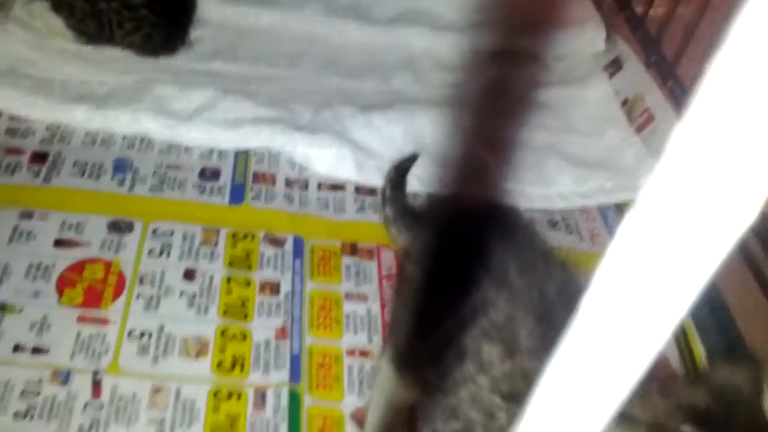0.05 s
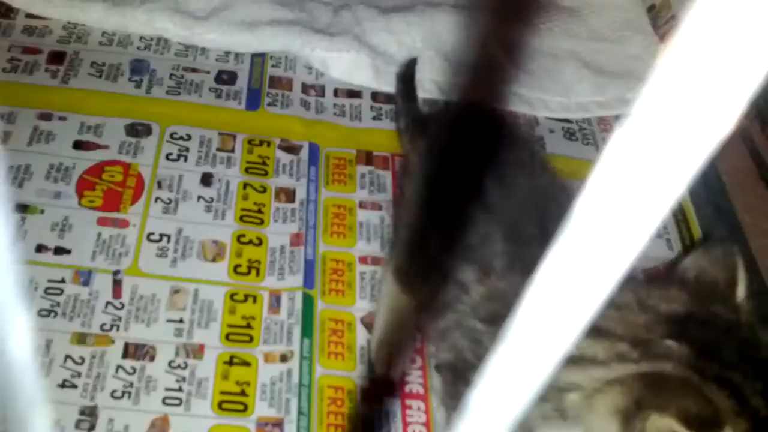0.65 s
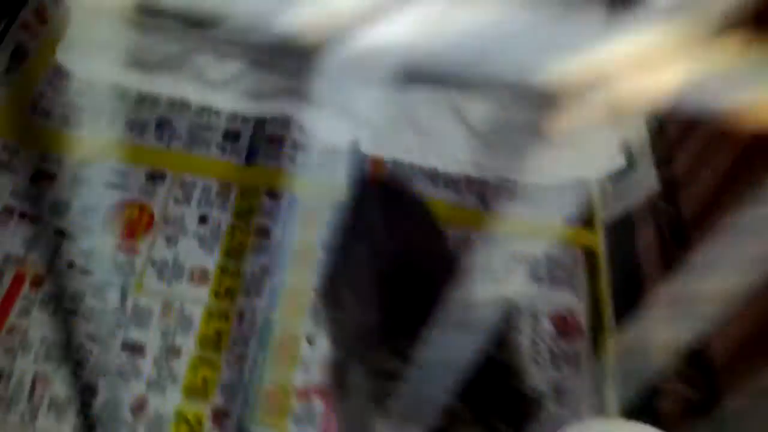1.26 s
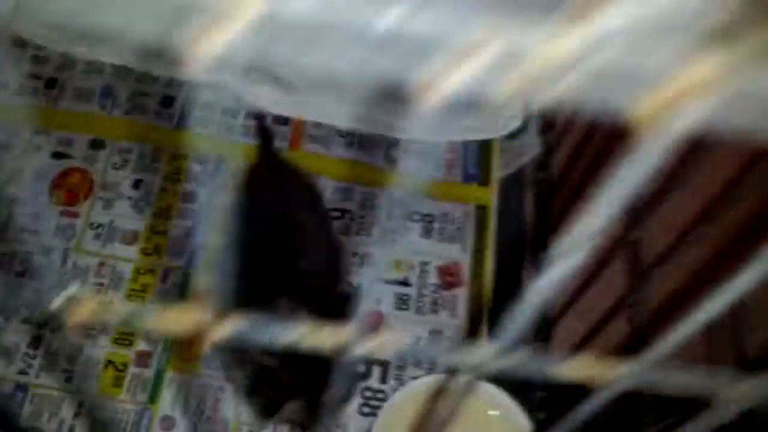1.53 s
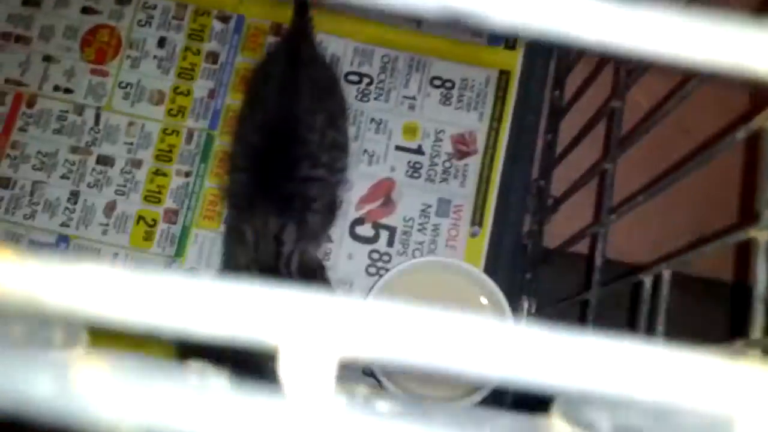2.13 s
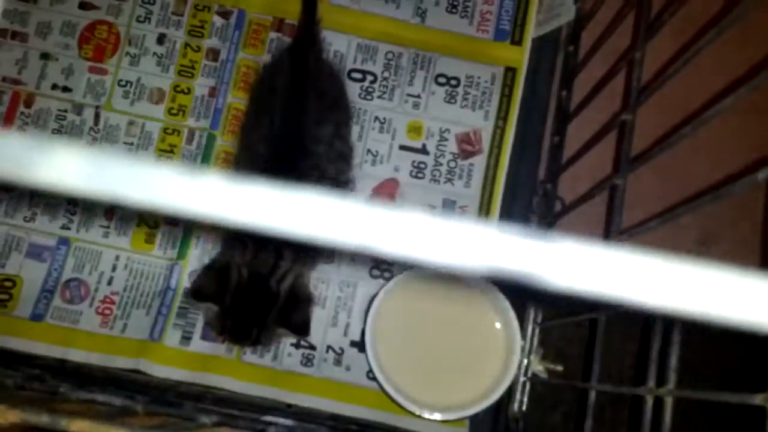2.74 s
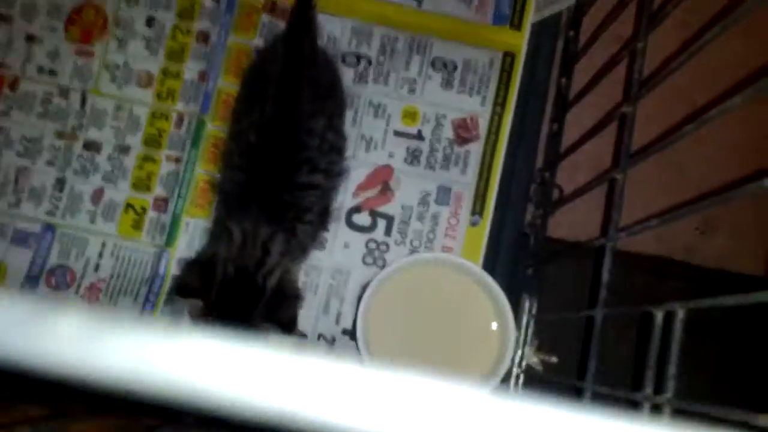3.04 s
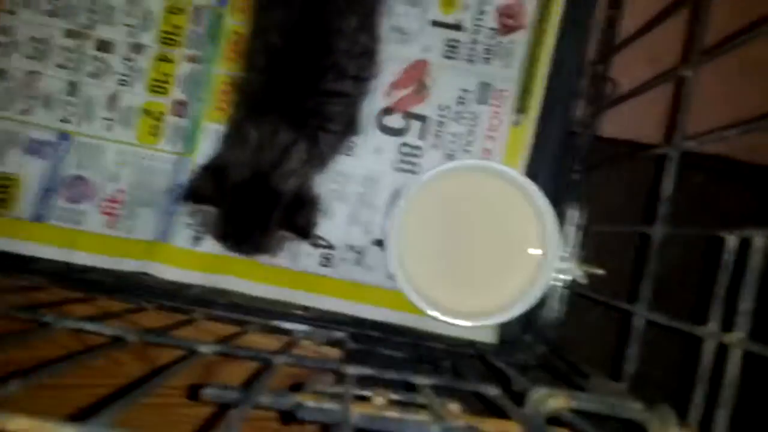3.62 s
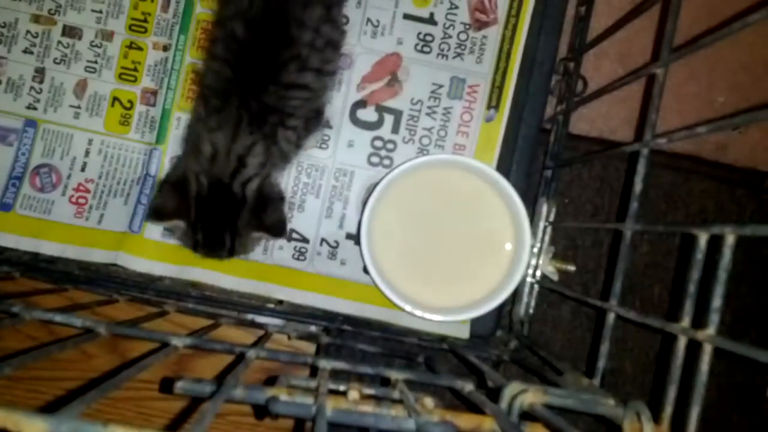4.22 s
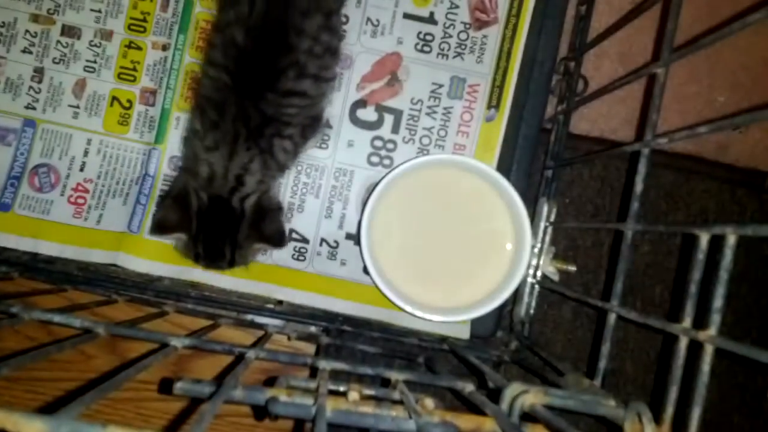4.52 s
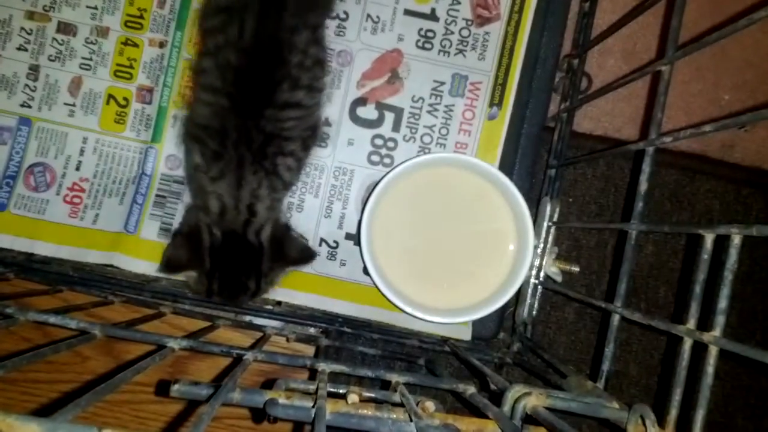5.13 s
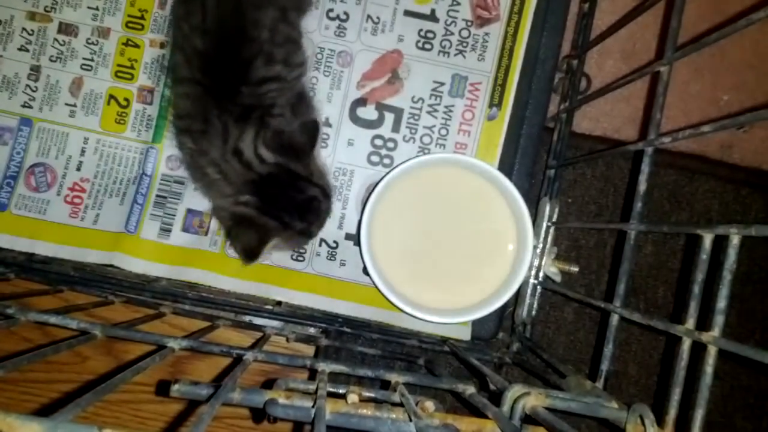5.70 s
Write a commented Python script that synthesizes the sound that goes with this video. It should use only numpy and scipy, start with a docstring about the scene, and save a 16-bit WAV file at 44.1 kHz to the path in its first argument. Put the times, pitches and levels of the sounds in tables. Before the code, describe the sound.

Soft, close rubbing and small creaks from a hand on the microphone open the scene, with faint ticks of newspaper. Just past halfway the microphone hits a cage bar with a loud crack. Loose wires of the crate then chatter, scrape and ring, growing louder over dull tray thumps, a heavy bump and brief scratches of kitten claws on paper. A quiet indoor hum with a faint whine lies underneath.

```python
"""A hand brushes a camera and a low ring dies away; then kittens stir on newspaper in a wire crate.
Creases tick and claws scuff; a finger swishes over the camera casing, the hand rubs and creaks on it,
and it knocks against a bar as it is pushed in. Then the crate rattles: loose wires strike, chatter and
ring the welded mesh, and the floor tray thumps. A quiet room with a faint whine lies underneath."""
import sys
import numpy as np
from scipy import signal
from scipy.fft import rfft, irfft
from scipy.io import wavfile
from scipy.ndimage import uniform_filter1d

SR = 44100
rng = np.random.default_rng(int(sys.argv[2]) if len(sys.argv) > 2 else 0)


def put_to_file(sound):
    """Save the sound as 16-bit audio at rate SR, in the file named by the first command-line argument."""
    columns = np.atleast_2d(sound).T  # one column per channel
    safe = np.clip(columns, -1, 1)
    whole_steps = np.round(safe * 32767)
    wavfile.write(sys.argv[1], SR, whole_steps.astype(np.int16))


N = 254406
T = np.arange(N) / SR


def undb(db):
    """Decibels to gain."""
    return 10 ** (np.asarray(db) / 20)


def unit(x, span_s=None):
    """Scale to rms 1, over the first span_s or over all."""
    head = x if span_s is None else x[:int(span_s * SR)]
    return x / np.sqrt(np.mean(head ** 2) + 1e-18)


def add(out, time_s, x):
    """Mix x in from time_s."""
    i = max(int(time_s * SR), 0)
    out[i:i + len(x)] += x[:max(N - i, 0)]


def filt(x, hz, kind, order=2):
    """Butterworth filter."""
    sos = signal.butter(order, np.clip(hz, 10, SR * .48), kind, fs=SR, output="sos")
    return signal.sosfilt(sos, x)


def noise(colour, size=N):
    """Noise of rms 1 with a spectrum of (frequency [Hz], level [dB]) points."""
    hz, db = np.transpose(colour)
    bins_hz = np.maximum(np.fft.rfftfreq(size, 1 / SR), 1)
    gain = undb(np.interp(np.log(bins_hz), np.log(hz), db))
    return unit(irfft(rfft(rng.standard_normal(size)) * gain, size))


def walk(rate_hz):
    """Random curve of spread 1, with rate_hz knots a second."""
    knots = rng.standard_normal(N // 20)
    return np.interp(T * rate_hz, np.arange(len(knots)), knots) * np.sqrt(3 / 2)


def stroke_gain(strokes, column):
    """Smoothed gain of a dB column over all strokes; silence between them."""
    gain = np.zeros(N)
    for rows in map(np.array, strokes):
        active = (T >= rows[0, 0]) & (T <= rows[-1, 0])
        gain += undb(np.interp(T, rows[:, 0], rows[:, column])) * active
    return uniform_filter1d(gain, size=300)


def swells(events, column, slopes_db_per_s):
    """Gain of events that rise, sag while they hold, then fall; column picks their level."""
    rise, sag, fall = slopes_db_per_s
    gain = np.zeros(N)
    for row in events:
        t, hold_s = T - row[0], row[1]
        drop_db = rise * np.maximum(-t, 0) + sag * np.clip(t, 0, hold_s)
        drop_db += fall * np.maximum(t - hold_s, 0)
        gain += undb(row[column] - drop_db)
    return gain


def mode_bank(modes, t):
    """One decaying complex sine per (frequency [Hz], level [dB], t60 [s]) mode."""
    hz, db, t60_s = np.transpose(modes)[:, :, None]
    return undb(db - 60 * t / t60_s) * np.exp(2j * np.pi * hz * t)


def strike(bank, spread_db):
    """Each blow lands elsewhere and shares its energy differently among the modes."""
    size, turn = rng.standard_normal((2, len(bank)))
    weights = undb(spread_db * size) * np.exp(2j * np.pi * turn)
    return np.einsum("m,mt->t", weights, bank).imag


def by_hardness(ends, hardness):
    """Interpolate between the (softest, hardest) contact's values."""
    return np.interp(hardness, [0, 1], ends)


# room noise spectrum: (frequency [Hz], level [dB])
ROOM_COLOUR = [(25, 7), (100, 6), (250, -4), (500, -12), (1000, -16), (1750, -19), (5000, -22), (7000, -20),
               (15000, -21.5)]
# electrical whine: (centre [Hz], width [Hz], level [dB])
WHINE_BANDS = [(473.6, 9.7, -70.5), (2570, 410, -69), (3840, 47, -77), (11600, 160, -77)]


def room(level_db=-56.5, whine_step_s=2.0, early_whine_db=-10):
    """Indoor rumble and hiss, with a thin electrical whine that steps up in level."""
    whine = np.zeros(N)
    for hz, width_hz, db in WHINE_BANDS:
        band_hz = [hz - width_hz / 2, hz + width_hz / 2]
        whine += undb(db) * unit(filt(rng.standard_normal(N), band_hz, "band"))
    whine *= undb(early_whine_db * (T < whine_step_s))
    return noise(ROOM_COLOUR) * undb(level_db) + whine


# spectrum of the crate's low ring: (frequency [Hz], level [dB])
HUM_COLOUR = [(80, -22), (135, -2.5), (175, 1), (225, -15), (282, -1), (340, -17.5), (1200, -21),
              (2500, -41)]


def crate_hum(level_db=-36.5, t60_s=0.89):
    """The crate's rough low ring fades out after a bump."""
    return noise(HUM_COLOUR) * undb(level_db - 60 * T / t60_s)


def squeak(start_s=0.077, length_s=0.12, hz=2975, level_db=-61):
    """A thin, wavering squeak."""
    swell = np.sqrt(np.clip(1 - (2 * (T - start_s) / length_s - 1) ** 2, 0, 1))
    pitch_hz = hz * (1 + 0.0038 * walk(160))
    return undb(level_db) * swell * np.sin(2 * np.pi * np.cumsum(pitch_hz) / SR)


# hand slides on the camera, one curve per stroke: (time [s], friction [dB], hiss [dB])
RUBS = [
    [(0.99, -69, -70), (1.01, -60, -66), (1.13, -53, -57.5), (1.24, -40, -45), (1.338, -40.5, -43.5),
     (1.378, -36, -37.5), (1.424, -39.5, -41), (1.48, -45.5, -36.5), (1.526, -42, -38.5), (1.545, -51, -54)],
    [(1.545, -53, -49), (1.589, -45, -37.5), (1.647, -44.5, -45), (1.761, -46.5, -45.5), (1.821, -44, -38),
     (1.891, -52, -51), (1.935, -77, -75)],
    [(2.97, -60, -61), (3.042, -51, -50.5), (3.084, -41.5, -45), (3.102, -35, -28), (3.13, -25, -17),
     (3.25, -44, -30), (3.344, -56.5, -57), (3.408, -54.5, -47.5), (3.43, -45, -46)],
]
# brief hand contacts: (time [s], hold [s], friction [dB], hiss [dB], rumble [dB])
BRUSHES = [(0, 0.007, -41, -37, -32), (1.805, 0.08, -66, -63, -44.5), (3.555, 0.13, -44.5, -44.5, -42)]
# spectrum of skin on casing: (frequency [Hz], level [dB])
RUB_COLOUR = [(50, -6), (108, -5.5), (362, -14), (646, -9.5), (1200, -10.5), (1910, -10), (3000, -10.5),
              (4500, -17), (6870, -10.5), (9180, -14), (13500, -14), (16000, -17.5)]


def hand_rubs(split_hz=4500, rumble_hz=520, rumble_db=-4.5, fast_db=-24, rasp_db=-9):
    """Skin drags over the casing: fine friction grains above an uneven low judder."""
    drag = noise(RUB_COLOUR)
    grain = undb(2 * walk(350) + walk(35.74))
    mids = filt(filt(drag, rumble_hz, "high", order=3), split_hz, "low", order=5)
    friction = unit(mids * grain)
    hiss = unit(filt(drag, split_hz, "high", order=5) * grain)
    rumble = unit(filt(drag, rumble_hz, "low", order=3) * undb(1.5 * walk(70)))
    slopes_db_per_s = (390, 22, 220)
    pressure = stroke_gain(RUBS, 1) + swells(BRUSHES, 2, slopes_db_per_s)
    speed = stroke_gain(RUBS, 2) + swells(BRUSHES, 3, slopes_db_per_s)
    judder = undb(rumble_db) * stroke_gain(RUBS, 1) + swells(BRUSHES, 4, slopes_db_per_s)
    # a fast stroke is sharper and makes the casing rasp
    sharpness = np.clip(speed / undb(fast_db), 0, 1) ** 2
    rasp = unit(filt(rng.standard_normal(N), [2300, 3200], "band") * grain)
    friction = (1 - sharpness / 3) * friction + (undb(rasp_db) + sharpness / 3) * rasp
    air = unit(filt(rng.standard_normal(N), 8600, "high") * grain)
    hiss = np.sqrt(1 - sharpness / 2) * hiss + np.sqrt(sharpness / 2) * air
    return friction * pressure + hiss * speed + rumble * judder


# runs of grip slips: (last slip [s], gap [s], count, last thud [dB], last grit [dB], push [s])
CREAKS = [(0.916, .009, 6, -54.5, -58, 0.00041), (0.966, 0.012, 4, -49, -58, 0.0011),
          (0.971, .02, 1, -51, -63, 0.00042), (1.085, 0.018, 4, -44.5, -53.5, 0.00082),
          (1.147, .02, 1, -53, -46, 0.0007), (1.933, 0.014, 5, -54, -68, 0.0021),
          (1.978, .02, 1, -56.5, -61, 0.0006), (2.331, 0.026, 2, -48, -48.5, 0.0021),
          (2.381, .02, 1, -45.5, -45, 0.0025), (2.402, .02, 1, -48, -51, 0.0014),
          (3.051, .0107, 4, -41, -63, 0.00066), (3.381, 0.029, 2, -52, -46.5, 0.00033),
          (3.402, .02, 1, -38.5, -50, 0.0011), (3.447, 0.0069, 3, -43.5, -50, 0.0015),
          (3.671, 0.05, 1, -43, -63, 0.0011)]


def grip_creaks(grit_s=0.0021, growth_db=1, early_push_db=-5, jitter=.08, scatter_db=1.2):
    """The grip slips in growing, uneven runs; each slip pushes the casing in and out and spurts grit."""
    out, t = np.zeros(N), T[:SR // 25] - .004
    for last_s, gap_s, count, thud_db, grit_db, push_s in CREAKS:
        u = t / push_s
        push = unit(u / (1 + u ** 2) ** 2, 0.013)
        for before_last in range(round(count)):
            early = before_last > 0  # early slips mostly grind; only the last lets go fully
            body, grit = rng.standard_normal((2, len(t))) * np.exp(-abs(t) / grit_s)
            body = unit(filt(body, [350, 1450], "band"), 0.0097)
            grit = unit(filt(grit, 1800, "high", order=1), 0.0053)
            thud = undb(5.5 + early_push_db * early) * push + undb(-2.5) * body
            slip = undb(thud_db) * thud + undb(grit_db) * grit
            shift, size = rng.standard_normal(2) * early
            time_s = last_s - (before_last + jitter * shift) * gap_s
            add(out, time_s - .002, undb(scatter_db * size - growth_db * before_last) * slip)
    return out


# finger slides on the casing: (time [s], hold [s], body [dB], hiss [dB])
SWISHES = [(.35, 0.11, -49, -50), (.712, 0.17, -55, -41.5), (2.15, 0.0099, -56, -61),
           (3.24, 0.06, -67, -36), (3.45, 0.072, -47.5, -33), (3.84, 0.0015, -53, -45),
           (3.875, 0.0057, -47, -50.5)]
# finger swish spectrum: (frequency [Hz], level [dB])
SWISH_COLOUR = [(300, -1.5), (600, 5.5), (1100, -0.5), (1600, -4), (2200, -3.5), (3100, 0.5), (4000, -20),
                (5900, -11), (8000, -9.5), (9400, -20.5), (10800, -6.5), (11900, -4), (13700, -6),
                (16000, -12)]


def finger_swishes(split_hz=4200, grain_db=2, hollow_hz=1530, hollow_db=9):
    """A finger slides over the camera casing with a grainy, slightly hollow swish."""
    slide = noise(SWISH_COLOUR) * undb(grain_db * walk(500))
    slide += undb(hollow_db) * filt(slide, [hollow_hz - 70, hollow_hz + 70], "band", order=1)
    slopes_db_per_s = (960, 40, 780)
    body = unit(filt(slide, split_hz, "low", order=4)) * swells(SWISHES, 2, slopes_db_per_s)
    hiss = unit(filt(slide, split_hz, "high", order=4)) * swells(SWISHES, 3, slopes_db_per_s)
    return body + hiss


# crease snaps: (time [s], level [dB], pitch [Hz], decay [s])
CRINKLES = [(0.211, -49, 12000, 0.0014), (0.503, -41, 2560, 0.0025), (.534, -37.5, 3430, 0.0015),
            (.801, -39, 11800, 0.0017), (2.775, -42.5, 10000, 0.0011), (2.841, -33, 10600, 0.0098),
            (3.843, -37.5, 11300, 0.0017), (4.594, -26.5, 4700, 0.0016)]


def paper_crinkles():
    """Creases in the newspaper snap with short ticks."""
    out, t = np.zeros(N), T[:SR // 8]
    for time_s, db, hz, decay_s in CRINKLES:
        snap = unit(filt(rng.standard_normal(len(t)), [hz / 2, hz * 1.17], "band", order=1))
        add(out, time_s, undb(db) * filt(snap, 510, "high") * np.exp(-t / decay_s))
    return out


# claws on paper: (time [s], level [dB], decay [s])
SCUFFS = [(4.533, -47, 0.023), (4.831, -41.5, 0.039), (5.263, -25, .022), (5.284, -24, 0.049),
          (5.436, -32, 0.02), (5.727, -29.5, .028)]
# scuff spectrum: (frequency [Hz], level [dB])
SCUFF_COLOUR = [(1200, -15), (2600, 0.5), (3600, -1.5), (4200, -6), (5200, -4.5), (5800, -1), (6450, 2),
                (9500, -14), (15000, -33)]


def claw_scuffs(grain_db=3):
    """A claw catches the paper and drags: a sudden crackle that fades."""
    out, t = np.zeros(N), T[:SR // 4]
    for time_s, db, decay_s in SCUFFS:
        crackle = noise(SCUFF_COLOUR, size=len(t)) * undb(grain_db * walk(707)[:len(t)])
        add(out, time_s, undb(db) * unit(crackle) * np.exp(-t / decay_s))
    return out


# camera hits a bar: (time [s], level [dB], final pitch [Hz], decay [s], crack re tone [dB])
KNOCKS = [(0.2643, -31, 470, 0.0021, -19), (3.5245, 15, 1188, 0.00097, -1.5),
          (3.5268, -9, 145, 0.0039, -10.5), (3.5357, -18.5, 1380, 0.00067, 3),
          (4.425, -12.5, 477, 0.0013, -7), (4.78, -20.5, 229, 0.0018, -12),
          (5.3236, 14.5, 188, 0.0017, -39), (5.336, -12.5, 2070, 0.00075, 9),
          (5.652, -20.5, 266, .002, -14)]


def camera_knocks(stiffening=1.67):
    """Blows on the camera body reach the microphone directly: a crack and a few dead cycles."""
    out, t = np.zeros(N), T[:SR // 20]
    for time_s, db, hz, decay_s, crack_db in KNOCKS:
        fade = np.exp(-t / decay_s)
        crack = unit(filt(rng.standard_normal(len(t)), 3700, "low"))
        pitch_hz = hz * (1 + stiffening * fade)  # the contact softens as it lets go
        tone = np.sin(2 * np.pi * np.cumsum(pitch_hz) / SR)
        add(out, time_s, undb(db) * fade * (tone + undb(crack_db) * crack))
    return out


# bar resonances: (frequency [Hz], level [dB], t60 [s])
BAR_MODES = [(300, 1.5, 0.22), (738, -5, .07), (1250, -11.5, 0.069), (2410, -9, 0.054), (5640, -16.5, 0.12),
             (6320, -13, .14)]


def bar_ring(time_s=3.525, level_db=-34.5, chatter_s=0.052):
    """The bar that takes the hardest knock chatters in its seat and rings roughly."""
    out, t = np.zeros(N), T[:SR]
    bounces = rng.standard_normal(len(t)) ** 3 * np.exp(-t / chatter_s)
    tones = mode_bank(BAR_MODES, t).imag.sum(0)
    ring = signal.fftconvolve(tones, bounces)[:len(t)]
    add(out, time_s, undb(level_db) * unit(ring, 0.053))
    return out


# bumps on the tray: (time [s], slap [dB], cutoff [Hz], boom [dB])
THUMPS = [(3.53, -30.5, 200, -39), (3.553, -37.5, 600, -42.5), (4.413, -30.5, 121, -36),
          (4.574, -35, 125, -47), (4.761, -34.5, 176, -36), (4.78, -36.5, 420, -27), (5.036, -35, 560, -28),
          (5.132, -35, 330, -47), (5.179, -34.5, 214, -24), (5.326, -23, 690, -44),
          (5.483, -35.5, 197, -43), (5.6, -36.5, 129, -52), (5.648, -35.5, 407, -27)]
# tray resonances: (frequency [Hz], level [dB])
TRAY_MODES = [(65.4, -3.5), (91.6, -2.5), (134.7, -2.5), (184, -2), (239, -9.5), (291.4, -2.5), (337.5, -5),
              (382, -3.5), (422, -2), (465.6, -3)]


def floor_tray(t60_s=0.4, flap_db=-3, flap_s=0.031, shake_db=(-27.5, -8.5), shake_hz=600, drag_db=-13,
               boom_hz=133.1, boom_rise_s=0.01, boom_t60_s=0.24):
    """The tray slaps and booms like a drum skin when bumped, and trembles when wires strike or drag."""
    out, t = np.zeros(N), T[:SR // 2]
    bank = mode_bank([(hz, db, t60_s) for hz, db in TRAY_MODES], t)
    shakes = [(time_s, db + by_hardness(shake_db, hardness), shake_hz)
              for time_s, db, hardness, _ in RATTLES]
    for time_s, db, cutoff_hz, *_ in THUMPS + shakes:
        ring = unit(strike(bank, spread_db=2.5) * (undb(-8) + np.exp(-t / 0.03)), 0.052)
        flap = unit(filt(rng.standard_normal(len(t)), [75, 520], "band") * np.exp(-t / flap_s), 0.026)
        slap = filt(filt(ring + undb(flap_db) * flap, cutoff_hz, "low"), 56, "high", order=3)
        add(out, time_s, undb(db) * unit(slap, 0.063))
    boom = mode_bank([(boom_hz, 0, boom_t60_s)], t)[0].imag * (1 - np.exp(-t / boom_rise_s))
    for time_s, _, _, boom_db in THUMPS:
        add(out, time_s, undb(boom_db) * boom / boom.max())
    tremble = unit(signal.fftconvolve(rng.standard_normal(N), bank.imag.sum(0))[:N])
    return out + undb(drag_db) * tremble * swells(SCRAPES, 2, SCRAPE_SLOPES_DB_PER_S)


# clear wire resonances: (frequency [Hz], level [dB])
WIRE_MODES = [(675, -9), (974, -4), (994, -2), (1111, -9), (1256, -6), (1418, -1), (1497, -5), (1550, -5),
              (1642, 0), (1686, -1), (1949, -3), (2305, -8), (2410, -11), (2675, -5), (3110, -10),
              (3400, -11), (4555, -11), (4834, -11), (5090, -11), (5599, -14), (6794, -3), (6942, -7),
              (7400, -9), (9520, -16), (10730, -14), (14250, -11)]
# spectrum of the weaker mesh modes: (frequency [Hz], level [dB])
MESH_COLOUR = [(550, -5), (974, 4), (1120, 0.5), (1680, 4), (2150, -13), (2900, -1.5), (3400, -5),
               (4000, -17), (5000, -9), (6050, -18.5), (7000, -1), (8800, -18), (10600, -13.5),
               (12000, -31), (13300, -17), (14200, -5.5), (15300, -35)]
MESH_SPLIT_HZ = 3900


def mesh_response(wire_t60_s=0.39, dull_t60_s=0.66, bright_t60_s=0.19, detune=.003):
    """The welded mesh answers one contact: clear modes, detuned by the load, in a crowd of weaker ones."""
    t = T[:SR // 2]
    crowd = noise(MESH_COLOUR, size=len(t))
    dull = filt(crowd, MESH_SPLIT_HZ, "low", order=1)
    crowd = dull * undb(-60 * t / dull_t60_s) + (crowd - dull) * undb(-60 * t / bright_t60_s)
    bank = mode_bank([(hz, db, wire_t60_s) for hz, db in WIRE_MODES], t)
    pitch_ratio = 1 + detune * rng.standard_normal()
    tones = np.interp(t * pitch_ratio, t, strike(bank, spread_db=2))
    damping = undb(-7.5) + np.exp(-t / 0.016)  # touching neighbours soak up the early ring
    return (unit(tones, 0.014) + unit(crowd, 0.05)) * damping


# wire drags over wire: (time [s], hold [s], ring [dB], bright ring [dB])
SCRAPES = [(4.42, 0.048, -46.5, -42), (4.58, 0.055, -45.5, -51), (4.82, 0.065, -34, -62),
           (4.9, 0.054, -40, -42.5), (4.97, 0.069, -35.5, -37.5), (5.541, 0.012, -40.5, -37.5),
           (5.58, 0.05, -36, -49)]
SCRAPE_SLOPES_DB_PER_S = (2000, 14, 190)  # rise, sag, fall


def wire_scrapes():
    """A dragged wire catches and lets go unevenly: a stream of tiny strikes on the mesh."""
    catches = rng.standard_normal(N) ** 3 * undb(4 * walk(60))
    drag = signal.fftconvolve(catches, mesh_response())[:N]
    low = unit(filt(drag, [900, MESH_SPLIT_HZ], "band", order=3))
    high = unit(filt(drag, 5440, "high", order=3))
    return (low * swells(SCRAPES, 2, SCRAPE_SLOPES_DB_PER_S)
            + high * swells(SCRAPES, 3, SCRAPE_SLOPES_DB_PER_S))


# loose wires collide: (time [s], ring [dB], hardness [0-1], chatter [s])
RATTLES = [(0.264, -54, 0.1, 0.0033), (3.525, -40, 0.7, 0.0045), (3.564, -39, 0.1, 0.018),
           (3.744, -42, 0, 0.027), (3.877, -35.5, 0.56, 0.041), (4.008, -43, 0, 0.05),
           (4.145, -41.5, 0.35, 0.037), (4.275, -43.5, 0.48, 0.048), (4.411, -41.5, 0.94, 0.014),
           (4.424, -28.5, 0.92, 0.0076), (4.533, -34.5, 0.56, .012), (4.574, -39.5, 0.89, 0.005),
           (4.681, -40, 0, 0.026), (4.761, -36.5, 0.74, 0.0063), (4.779, -35.5, 0.88, 0.021),
           (4.951, -31, 0.95, 0.004), (5.039, -34, 0.72, 0.0023), (5.131, -30.5, 0.75, 0.015),
           (5.147, -31.5, 0.96, 0.0059), (5.166, -20.5, 0.95, 0.015), (5.263, -27.5, 0.4, 0.0063),
           (5.283, -25.5, 0.44, 0.044), (5.323, -20.5, 0.89, 0.025), (5.358, -18.5, 1, 0.0067),
           (5.435, -26.5, 0.6, 0.026), (5.539, -35, 0.99, 0.003), (5.616, -37, 0.64, 0.0027),
           (5.641, -35, 0.99, 0.009), (5.651, -29, 0.88, 0.0053), (5.727, -28.5, 0.52, 0.02)]


def wire_rattles(brightness_db=(-49, 1.5), contact_hz=(1830, 14600), crack_db=-8):
    """A wire strikes, chatters and sets the mesh ringing; a harder contact rings brighter."""
    out, t = np.zeros(N), T[:SR // 2]
    for time_s, ring_db, hardness, chatter_s in RATTLES:
        bright_db = ring_db + by_hardness(brightness_db, hardness)
        cutoff_hz = np.exp(by_hardness(np.log(contact_hz), hardness))
        bounces = rng.standard_normal(len(t)) ** 3 * np.exp(-t / chatter_s)
        contact = 0.011 * bounces + (t == 0)
        ring = filt(signal.fftconvolve(mesh_response(), contact)[:len(t)], cutoff_hz, "low")
        # a light tap stirs only the short, high wires
        lowest_hz = np.interp(ring_db, [-40, -25], [950, 400])
        low = unit(filt(filt(ring, lowest_hz, "high"), MESH_SPLIT_HZ, "low", order=6), 0.0097)
        crack = filt(filt(bounces, 1400, "high", order=1), cutoff_hz, "low")
        high = unit(filt(ring, MESH_SPLIT_HZ, "high", order=4), 0.018)
        high += undb(crack_db) * unit(crack, 0.028)
        add(out, time_s, undb(ring_db) * low + undb(bright_db) * unit(high, 0.0087))
    return out


def scene():
    """All sources at one microphone."""
    rustling = hand_rubs() + finger_swishes() + paper_crinkles() + claw_scuffs()
    creaking = grip_creaks() + squeak()
    crate = wire_rattles() + wire_scrapes() + floor_tray() + crate_hum()
    return (rustling + creaking + crate + camera_knocks() + bar_ring() + room())[None]


def record(dry):
    """The microphone loses the deepest bass, overloads on the hardest knocks and cuts the top."""
    bass_hz, top_hz, ceiling = 35, 15800, .62
    clipped = np.clip(filt(dry, bass_hz, "high", order=1), -ceiling, ceiling)
    return signal.sosfilt(signal.ellip(10, .2, 80, top_hz, fs=SR, output="sos"), clipped)


dry = scene()
out = record(dry)
put_to_file(out)
```